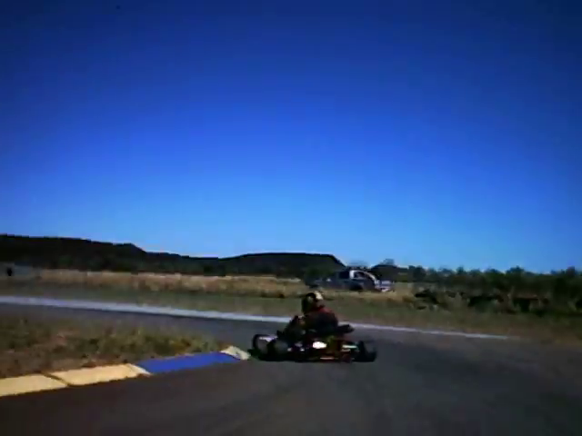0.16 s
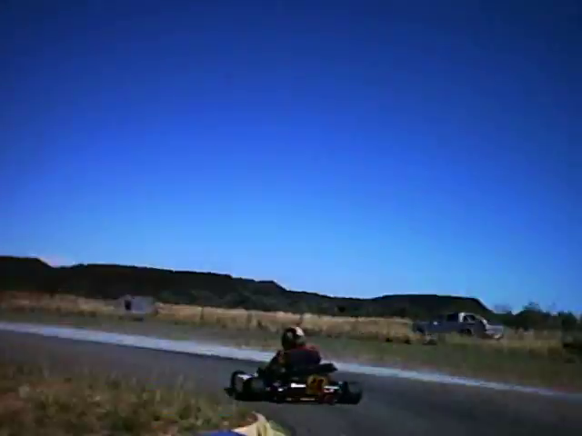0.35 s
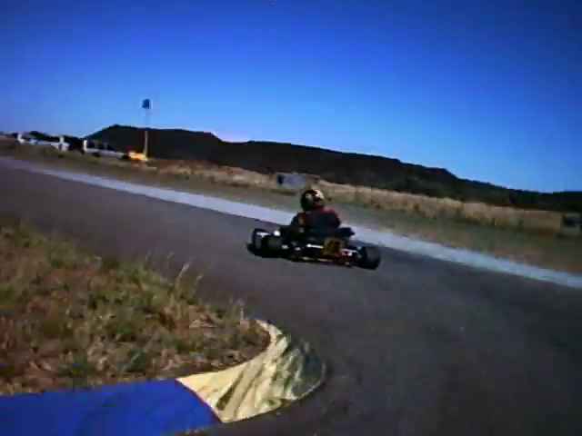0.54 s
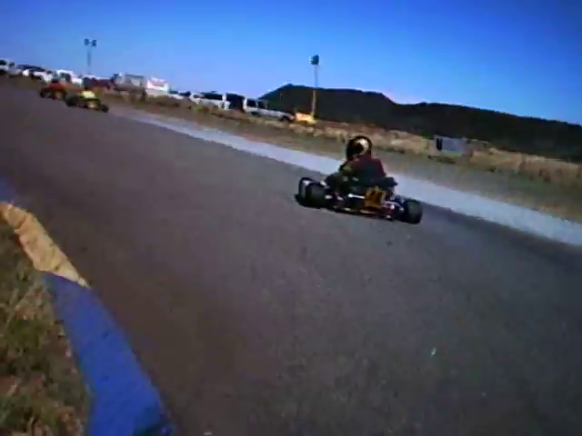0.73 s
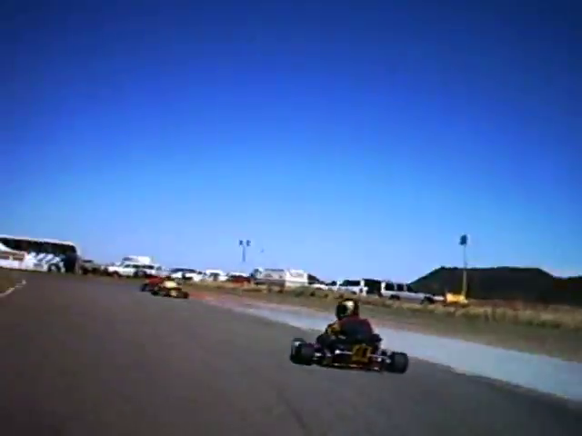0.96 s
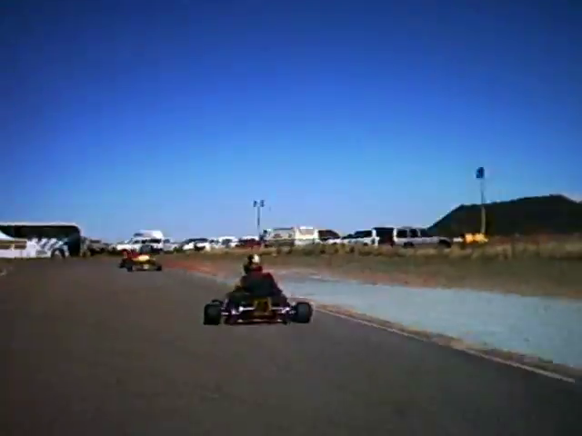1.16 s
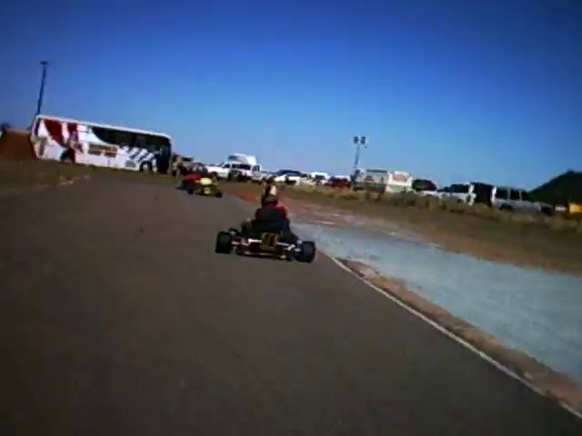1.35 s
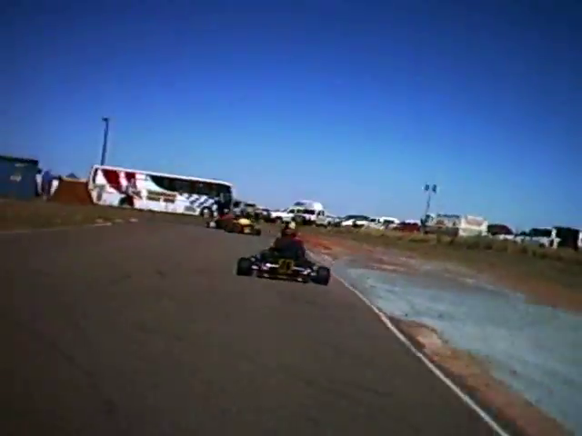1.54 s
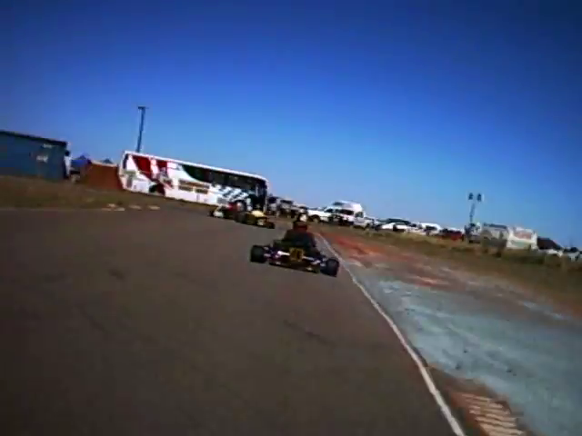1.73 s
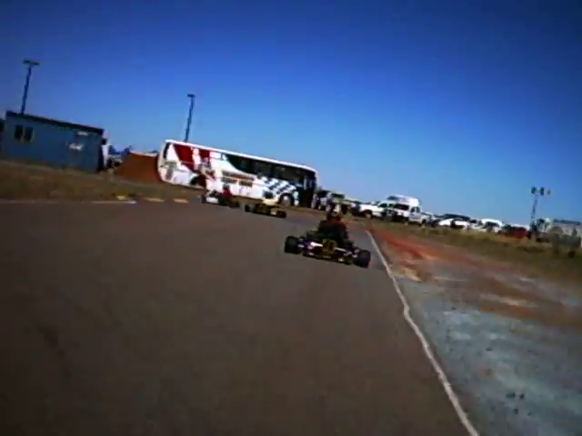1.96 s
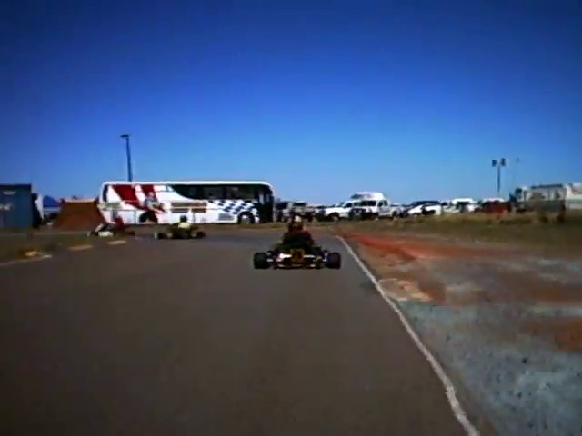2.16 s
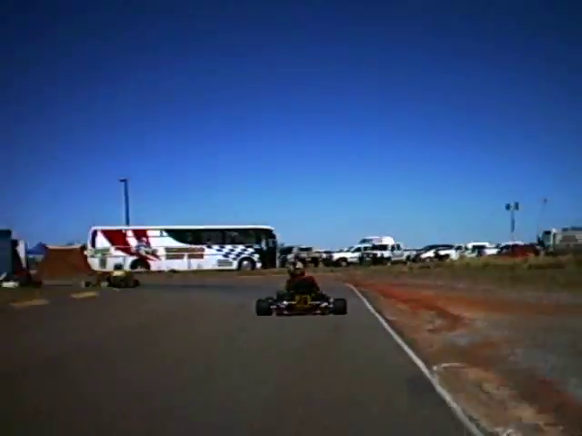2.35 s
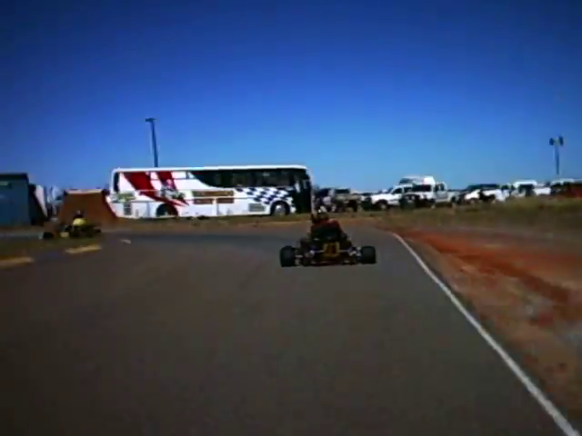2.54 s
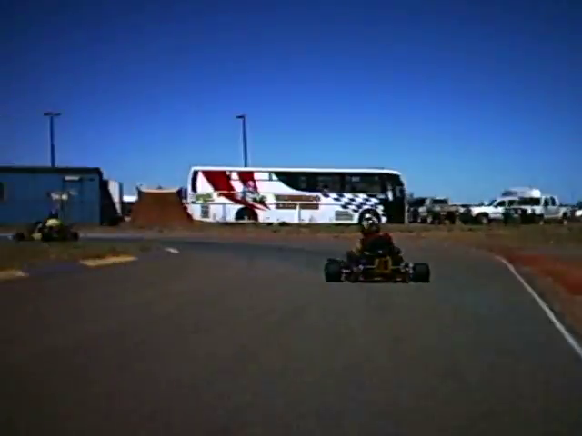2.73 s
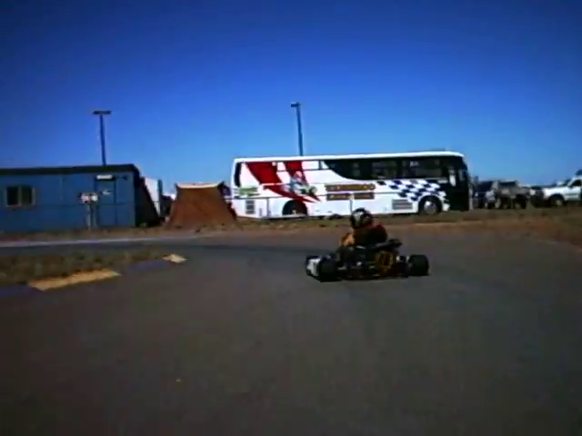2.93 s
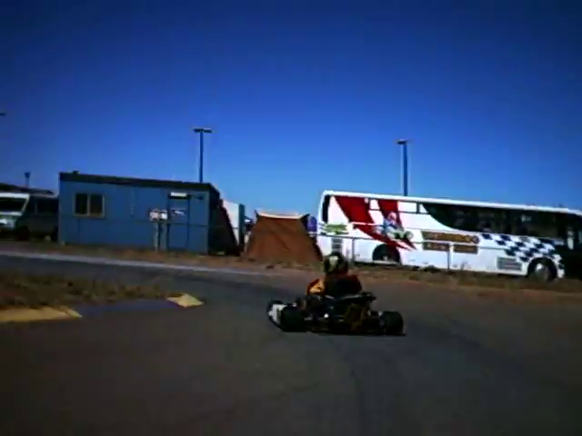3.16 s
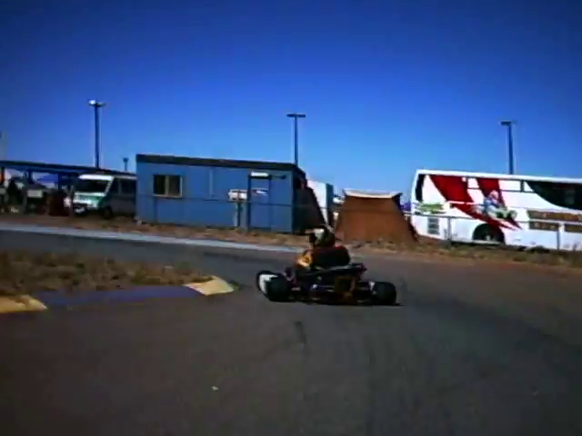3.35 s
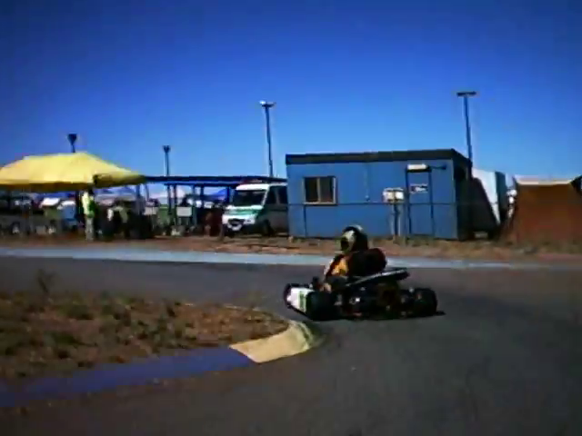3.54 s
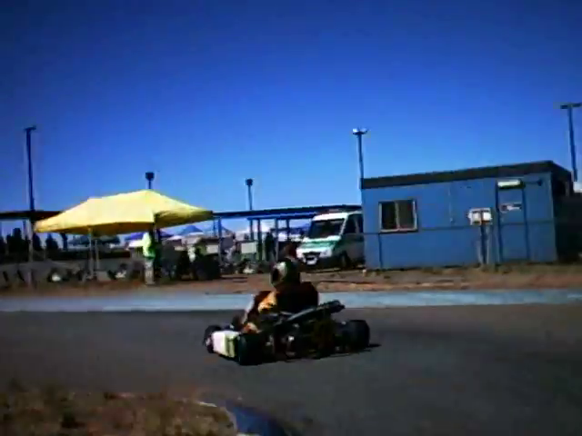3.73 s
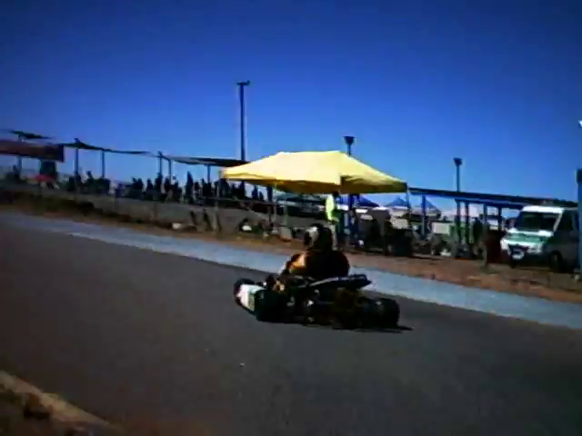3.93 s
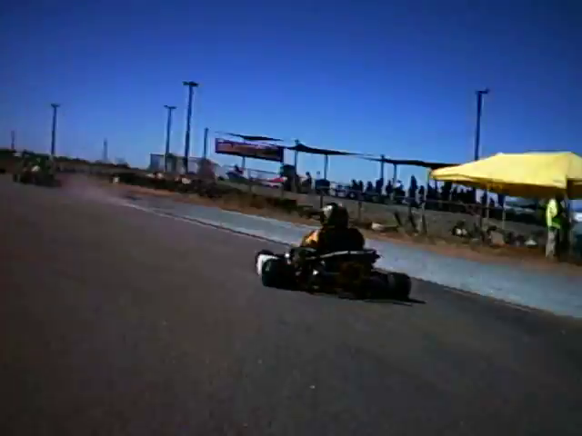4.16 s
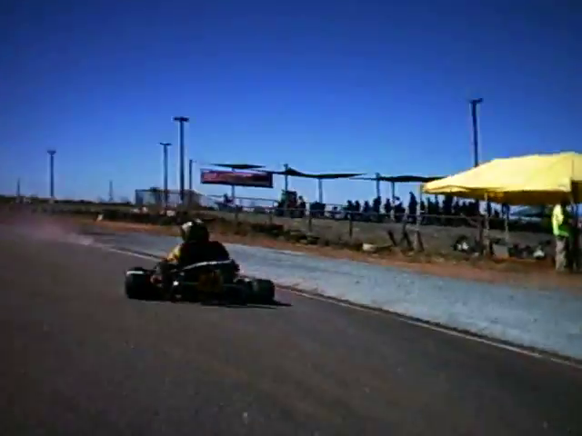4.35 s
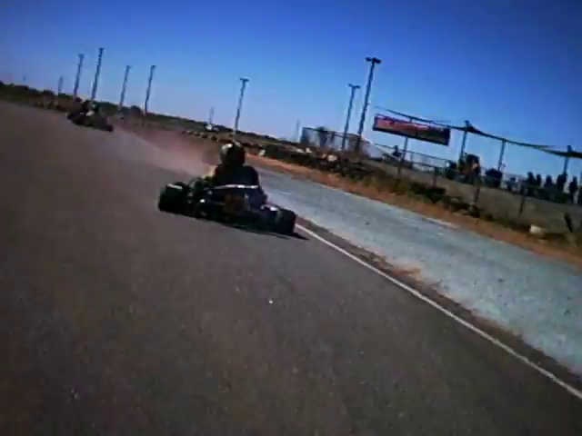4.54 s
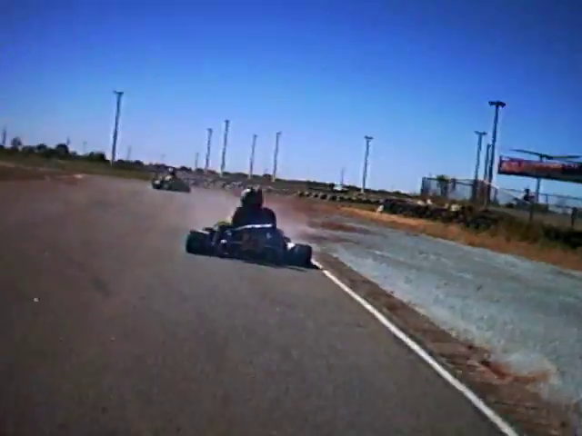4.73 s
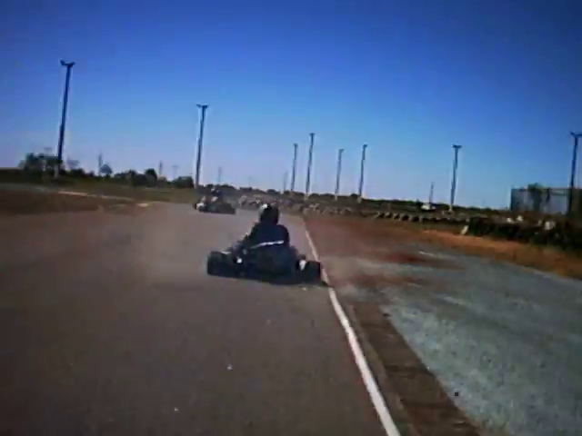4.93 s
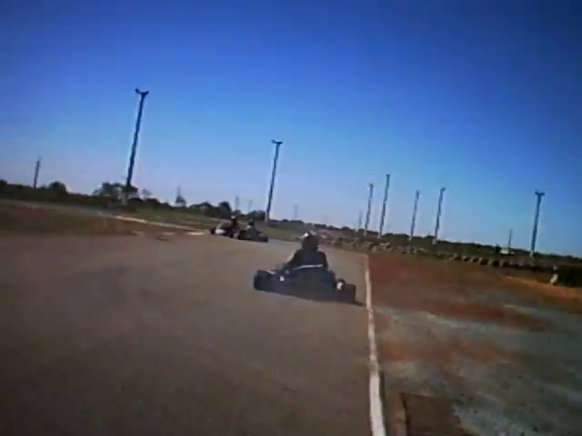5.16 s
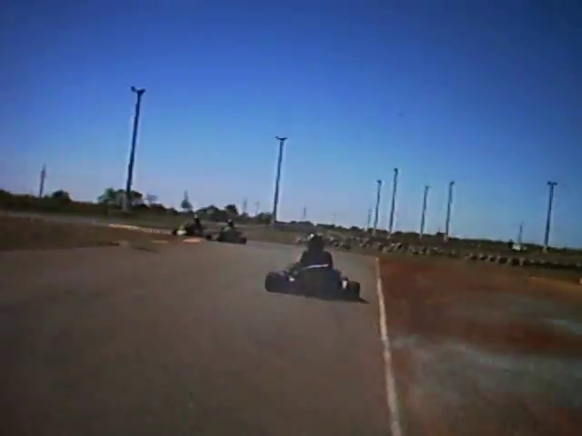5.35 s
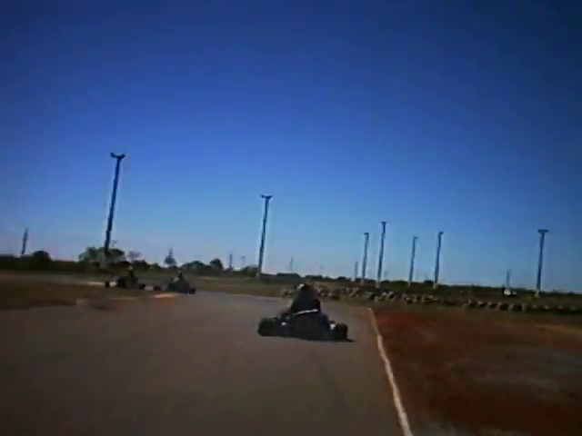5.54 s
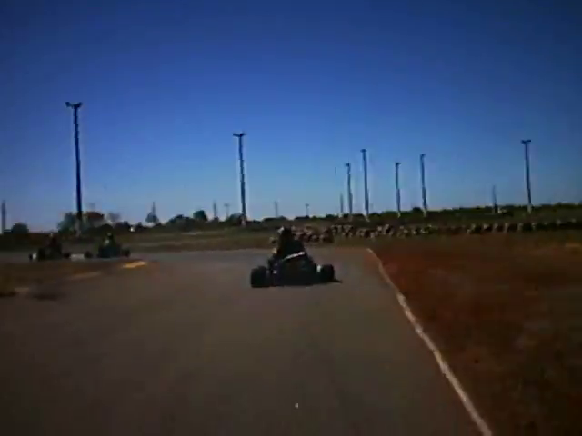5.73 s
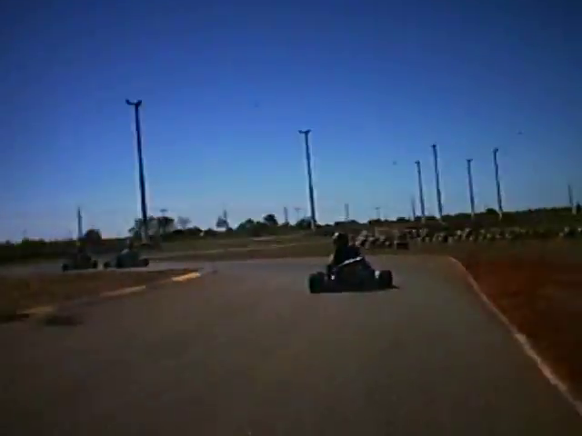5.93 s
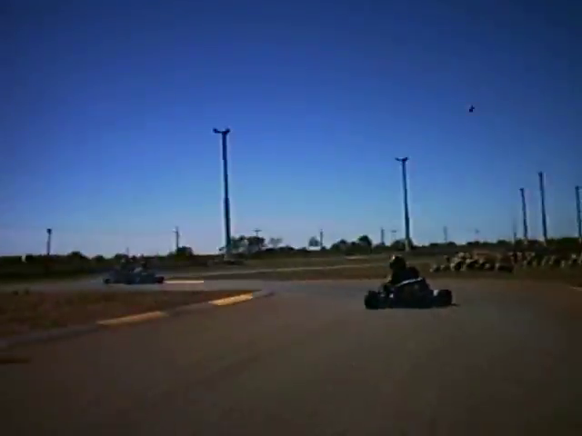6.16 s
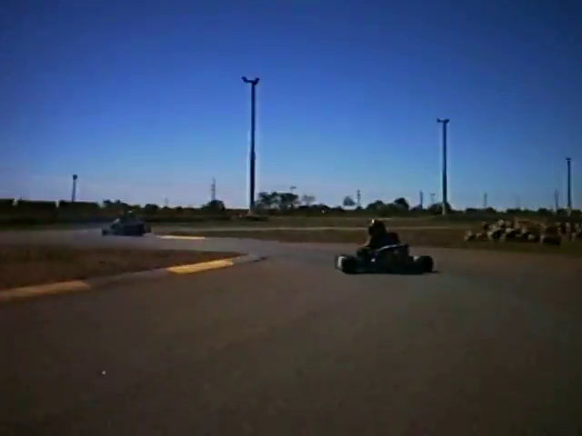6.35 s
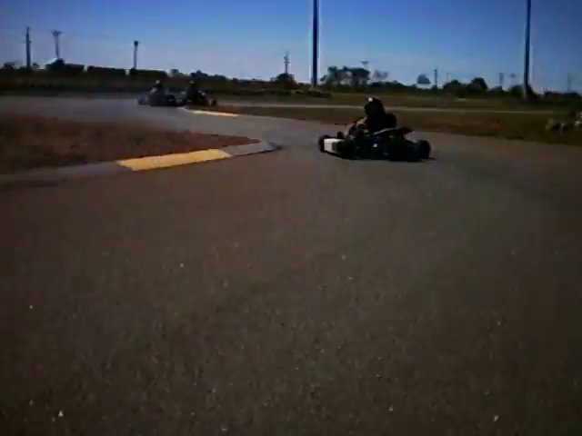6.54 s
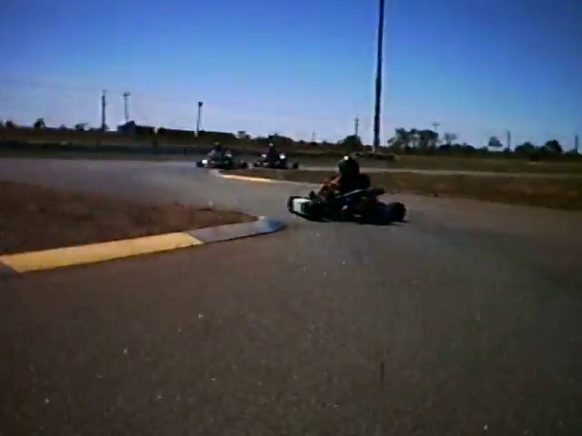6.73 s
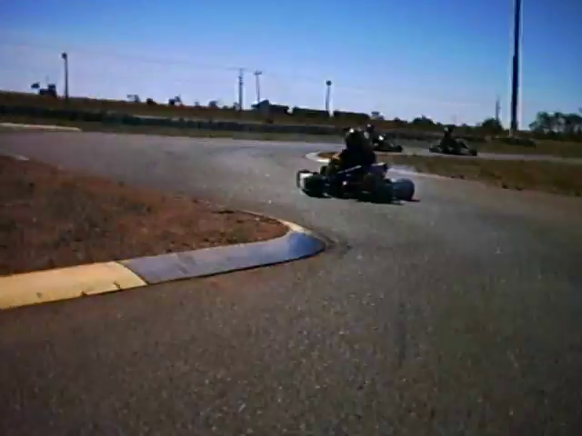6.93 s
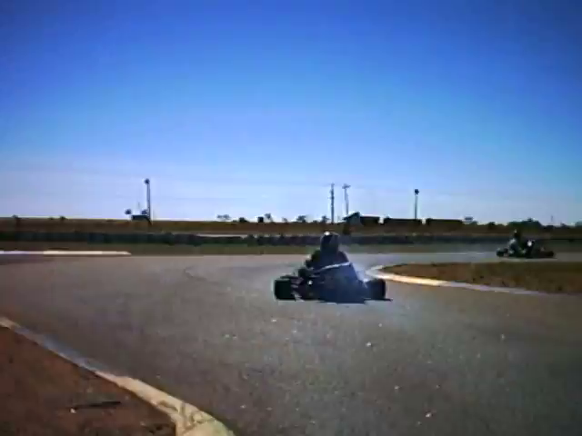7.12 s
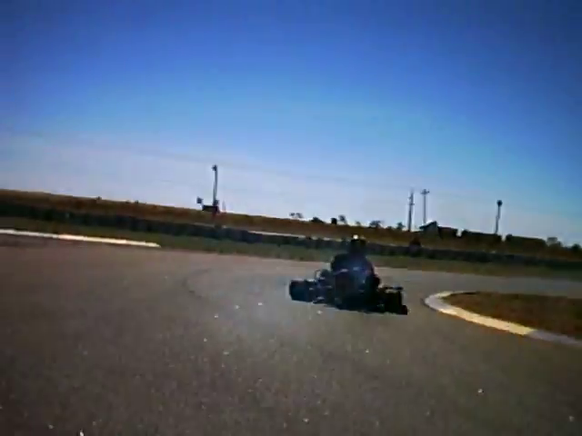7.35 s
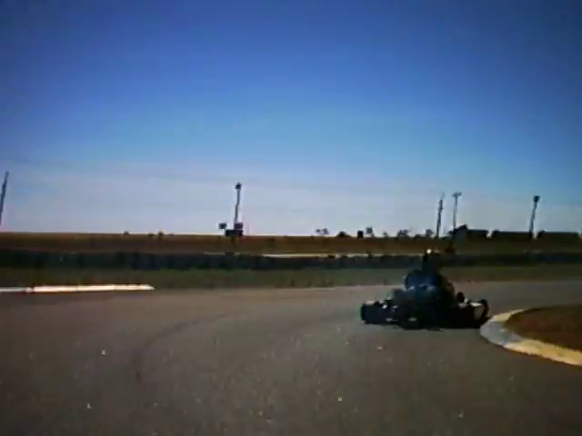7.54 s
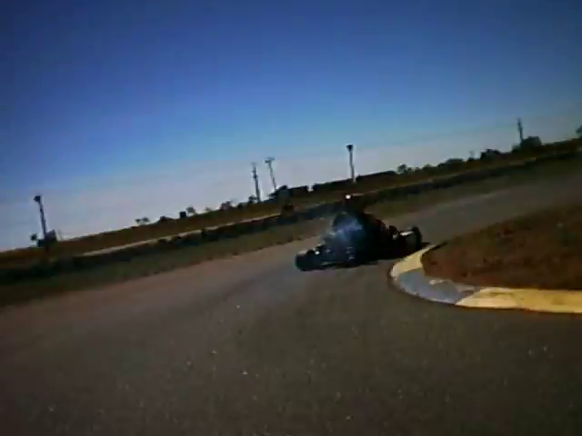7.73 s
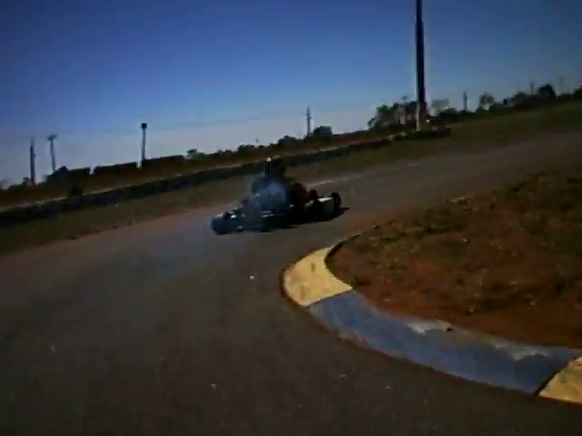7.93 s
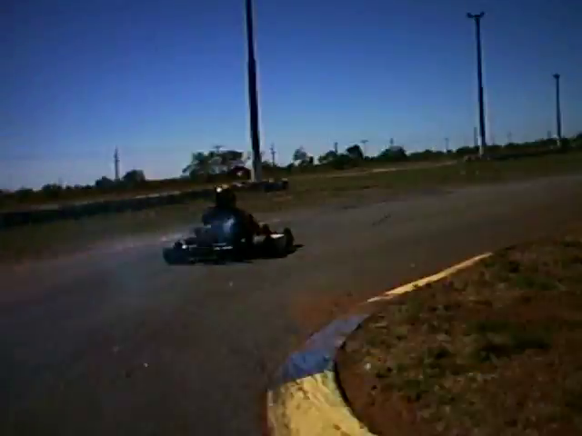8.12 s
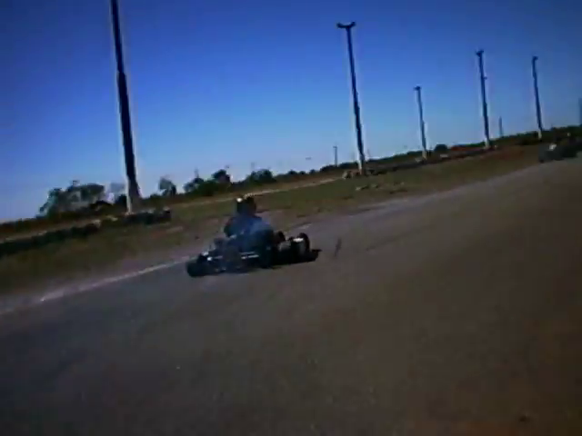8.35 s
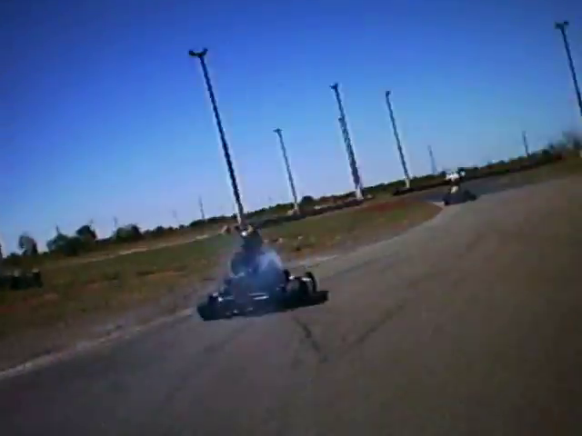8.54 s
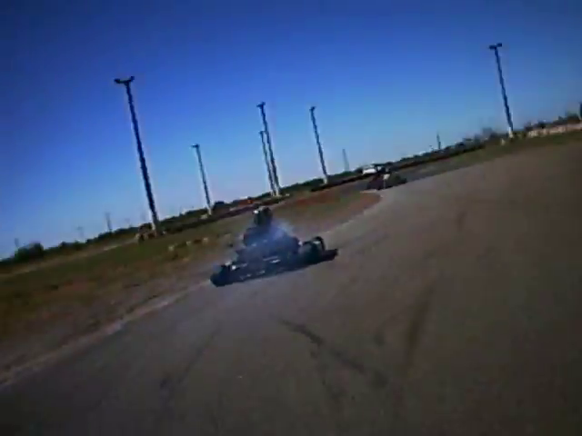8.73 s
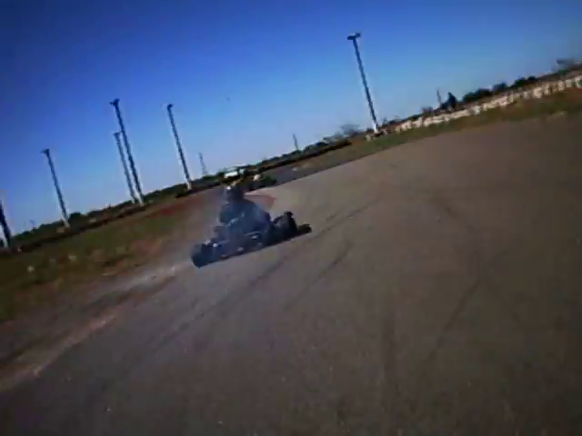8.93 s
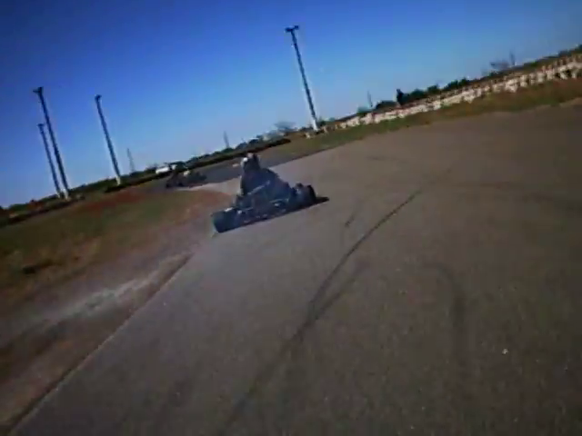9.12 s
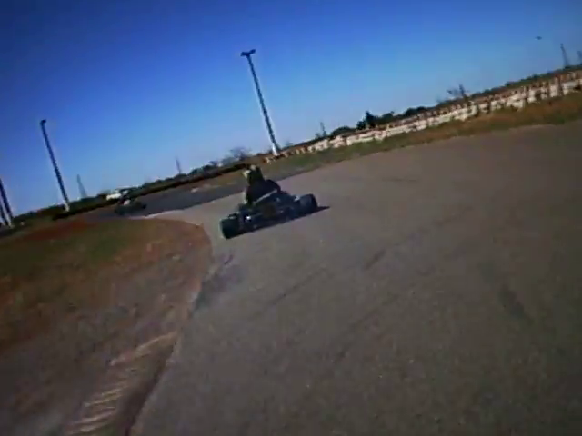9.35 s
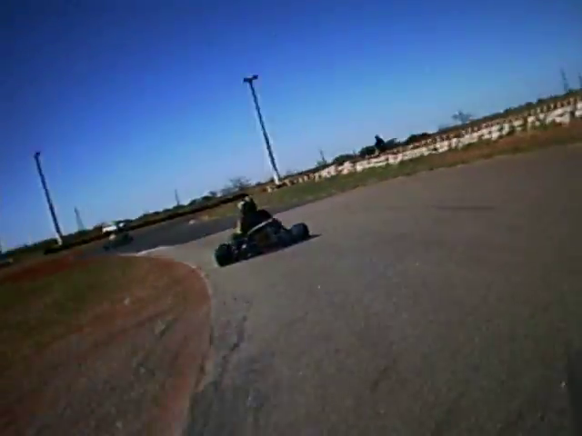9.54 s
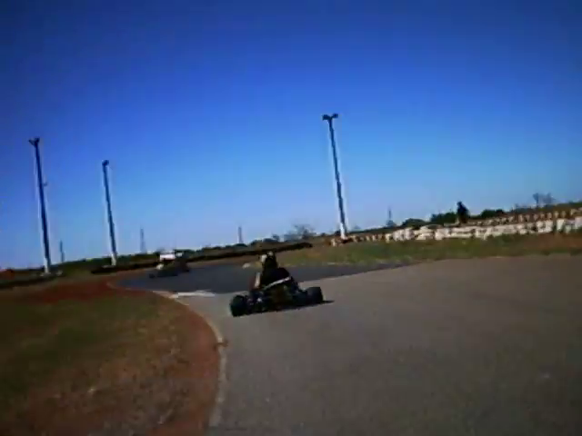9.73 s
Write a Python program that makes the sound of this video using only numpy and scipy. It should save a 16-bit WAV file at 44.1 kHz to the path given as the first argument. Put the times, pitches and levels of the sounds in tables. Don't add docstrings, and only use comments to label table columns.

```python
import sys
import numpy as np
from scipy import signal
from scipy.fft import rfft, irfft
from scipy.io import wavfile

SR = 44100
rng = np.random.default_rng(int(sys.argv[2]) if len(sys.argv) > 2 else 0)


def convert_level_to_amplitude(level_db):
    exponent = np.asarray(level_db, float) / 20
    return 10 ** exponent


def materialize(psi):
    bounded = np.clip(np.atleast_2d(psi).T, -1, 1)
    quanta = np.round(bounded * 32767).astype(np.int16)
    wavfile.write(sys.argv[1], SR, quanta)


N = 431298

# t/s, f/Hz
OWN_FIRING_HZ = [(0.0, 211.8), (0.45, 205.8), (0.69, 188.1), (1.2, 192.5), (2.14, 231.4), (2.21, 190.0),
                 (3.0, 191.9), (3.42, 172.4), (4.35, 162.2), (5.1, 172.6), (5.4, 190.9), (6.44, 232.4),
                 (6.64, 204.3), (7.2, 190.8), (7.7, 175.9), (8.4, 176.7), (9.0, 193.4), (9.78, 225.3)]
# t/s, rise/Hz, rise and fall time/s
FLARES_HZ = [(0.55, 4.1, 0.12), (0.94, 5.0, 0.06), (1.07, 11.4, 0.12), (1.31, 10.2, 0.08),
             (1.52, 9.4, 0.06), (2.45, 8.1, 0.12), (2.79, 2.9, 0.15), (3.6, 17.0, 0.12), (3.77, 7.4, 0.1),
             (4.0, 6.3, 0.12), (4.11, 7.0, 0.2), (4.25, 7.1, 0.1), (4.47, 7.6, 0.08), (4.65, 7.8, 0.1),
             (4.76, 8.9, 0.2), (4.96, 6.1, 0.2), (5.15, 10.7, 0.06), (5.33, 6.0, 0.08), (5.43, 7.5, 0.15),
             (5.7, 3.7, 0.12), (6.25, 3.9, 0.2), (6.9, 4.6, 0.2), (7.52, 11.3, 0.2), (7.83, 6.1, 0.08),
             (8.0, 15.1, 0.12), (8.52, 15.9, 0.1), (8.74, 8.1, 0.08), (8.95, 8.0, 0.08), (9.32, 3.0, 0.1),
             (9.56, 4.8, 0.08)]
# t/s, level/dB
LOAD_DB = [(0, -22), (.75, -17.5), (.92, -17), (1.5, -9), (2.0, -10.5), (2.4, -14), (2.7, -28.5),
           (3.5, -18.5), (3.8, -15.5), (4.4, -17.5), (4.75, -17.5), (5.6, -13.5), (6.3, -17), (6.5, -21),
           (7.1, -25), (7.4, -19.5), (8.5, -14), (9.78, -14)]
# t/s, level/dB, rise and fall time/s
STABS_DB = [(.25, -3, 0.29), (1.95, -3, 0.29), (3.05, -4, 0.18), (6.6, -4, .15), (7.3, 4.5, 0.16),
            (.5, -1.5, 0.089), (1.2, 5, 0.058), (3.2, 3, 0.25), (3.55, -8, 0.14), (4.95, -8.5, 0.084),
            (5.55, 4.5, 0.15), (7.75, -6.5, 0.16), (7.98, 3.5, 0.063), (8.25, -1.5, .12), (8.55, 3.5, .1),
            (9.1, -3, 0.16), (9.4, -2.5, 0.17)]
# order/1, level/dB
OWN_ORDERS_DB = [(1, 3), (2, -2.5), (3, -9), (4, 2.5), (5, -.5), (6, 1), (7, -1.5), (8, -2.5), (10, 0),
                 (13, -2.5), (16, -5.5), (20, -10)]
# offset/dB, share of load swing/1, flare slope/(dB/Hz), firing rate slope/(dB/Hz)
ORDER_GROUPS = [
    (-1, 1, 0.25, 0.06),
    (-0.36, 0.75, 0.35, 0.135),
    (-2.9, 1, 0.14, 0.24),
    (-3.5, 0.75, 0.47, 0.1043),
]
# f/Hz, level/dB
PIPE_PATH_DB = [(410, -33), (800, -31), (950, -19), (1170, -9), (1370, -13), (1500, -21), (1850, -23),
                (2150, -10), (2530, -5), (2860, 2), (3100, -1.5), (3330, -13), (3650, -11), (4020, -17),
                (4400, -30)]
# t/s, f/Hz
RIVAL_FIRING_HZ = [
    [(.15, 161.8), (.31, 155.7), (.49, 168), (.54, 168.3), (.6, 175), (.83, 180.7), (.91, 189.7),
     (1.15, 195.5)],
    [(4, 146.8), (4.22, 149.3), (4.51, 161), (4.7, 173), (4.84, 182.3), (5, 190.5), (5.46, 215.3),
     (5.7, 223.8)],
]
# t/s, level/dB
RIVAL_FIRST_DB = [(.15, -39), (.3, -29.5), (0.499, -28.5), (0.699, -27), (0.848, -26), (1.001, -23),
                  (1.15, -27.5)]
RIVAL_SECOND_DB = [(4, -36), (4.1, -25.5), (4.298, -28.5), (4.502, -26), (4.754, -34), (5.002, -19.5),
                   (5.25, -27.5), (5.503, -27), (5.701, -27)]
# order/1, level/dB
RIVAL_ORDERS_DB = [(1, -25.5), (3, -16.5), (4, -5.5), (7, -5.5), (10, 2.1), (14, -4), (17, -11.5), (22, -6)]
# t/s, level/dB
ROAR_DB = [(0, -14), (0.9, -16.5), (1.8, -14), (2.5, -12), (3.0, -17.5), (3.5, -17.5), (4.5, -12),
           (5.4, -11.0), (5.8, -15.5), (6.2, -11), (6.9, -7.5), (7.6, -11.5), (7.85, -14.5), (8.5, -11.5),
           (9.1, -8), (9.78, -14.5)]
# t/s, level/dB, rise and fall time/s
SURGES_DB = [(.25, -1.5, 0.1), (.67, -3, 0.05), (.86, -1, 0.049), (.98, 2.5, 0.13), (1.42, 6.5, 0.037),
             (2.18, -6, 0.19), (3.58, 3, 0.096), (4.98, 1, 0.053), (5.5, 2.5, 0.13), (6.49, -3, 0.086),
             (6.68, -1.5, 0.1), (6.99, -1, 0.062), (7.43, -3.5, 0.05), (8.02, 1, 0.3), (8.41, 2, 0.05),
             (8.73, -2, 0.11), (8.98, -0.5, 0.13), (9.55, 2.5, 0.15)]
# level/dB, shares of roar, wind and load swing/1, slow patchiness/dB, quick patchiness/dB
ROAR_PARTS = [
    (-28, 0.44, 0.43, 0.39, 1.9, 1.3),
    (-15, 1.44, 0.03, 0.31, 1.11, 0.76),
    (-23.5, 0.46, 0.62, 0.011, 1.77, 2),
]
# f/Hz, level/dB
HOUSING_DB = [(410, -29), (750, -24), (950, -22), (1170, -12), (1370, -16), (1500, -22), (1800, -19.5),
              (2130, -16), (2530, -11), (2860, -3), (3100, -7.5), (3330, -19), (3650, -9.5), (4020, -17),
              (4370, -22.5), (4800, -69.5)]
# t/s, peak level/dB, thud f/Hz, thud level/dB
KNOCKS = [
    (0.148, -15, 61.9, -39),
    (1.468, -9.5, 73.5, -26),
    (2.218, -14, 142.3, -37),
    (2.361, -10, 61.5, -38),
    (2.909, -10.5, 142, -32.5),
    (3.784, -28, 64.3, -31),
    (4.598, -13, 140.3, -43),
    (5.282, -16, 71, -32.5),
    (6.91, -26, 57.7, -27),
    (8.642, -28, 131, -26.5),
]
# t/s, level/dB
WIND_DB = [(0, -44.5), (0.8, -50.5), (1.5, -42), (2.1, -43.5), (2.45, -33.5), (3, -49), (3.5, -42),
           (4.3, -41.5), (5.2, -35.8), (6.2, -35), (7, -34.5), (7.9, -42), (8.6, -32), (9.78, -33.5)]
# t/s, level/dB, rise and fall time/s
GUSTS_DB = [(.94, 7, .08), (1.47, 2.5, .12), (1.73, 6.5, .16), (2.17, -3, 0.22), (2.45, -4, .08),
            (3.5, -4, 0.2), (4.12, -5, 0.13), (5.08, -9.5, 0.065), (6.22, 4, .12), (6.69, -6.5, .08),
            (7.16, -11, 0.072), (7.42, -6, 0.08)]
# f/Hz, level/(dB per Hz)
BUFFET_SPECTRUM_DB = [(12, -42), (20, -7), (80, -3), (400, -10.5), (520, -36.5), (880, -120)]

MID_LOAD_DB, MID_FIRING_HZ = -18, 195
MID_ROAR_DB, MID_WIND_DB = -13, -40


def own_kart():
    (cruise_hz,), (load_db,) = in_time(OWN_FIRING_HZ), in_time(LOAD_DB)
    flare_hz = swells(FLARES_HZ)
    load_swing_db = load_db + swells(STABS_DB) - MID_LOAD_DB
    groups_db = []
    for offset_db, load_share, flare_db_per_hz, rate_db_per_hz in ORDER_GROUPS:
        group_db = MID_LOAD_DB + offset_db + load_share * load_swing_db
        group_db = group_db + flare_db_per_hz * flare_hz + rate_db_per_hz * (cruise_hz - MID_FIRING_HZ)
        groups_db.append(group_db)
    low, middle, high, top = groups_db
    order_db = 3 * [middle] + 2 * [low] + 2 * [middle] + 4 * [high] + 9 * [top]
    return buzz(cruise_hz + flare_hz, OWN_ORDERS_DB, order_db, wobble=.002, flutter_db=3)


def buzz(firing_hz, orders, order_db, wobble, flutter_db):
    turns = np.cumsum(firing_hz * (1 + wobble * drift(25))) / SR
    out = np.zeros(N)
    for k, load_db in enumerate(order_db, 1):
        path_db = on_log(PIPE_PATH_DB, k * firing_hz)
        level_db = load_db + on_log(orders, k) + path_db + flutter_db * drift(5)
        out += convert_level_to_amplitude(level_db) * np.sin(2 * np.pi * (k * turns + rng.random()))
    return out, turns


def kart_ahead(firing_table, loudness_table):
    (firing_hz,), (buzz_db,) = in_time(firing_table), in_time(loudness_table)
    t = np.arange(N) / SR
    start_s, end_s = firing_table[0][0], firing_table[-1][0]
    fade = np.clip(np.minimum(t - start_s, end_s - t) / .1, 0, 1)
    tone, _ = buzz(firing_hz, RIVAL_ORDERS_DB, 22 * [buzz_db + 8], wobble=.0015, flutter_db=3)
    return fade * tone


def roar(turns, puff_depth=.2):
    roar_swing_db = in_time(ROAR_DB)[0] + swells(SURGES_DB) - MID_ROAR_DB
    wind_swing_db = in_time(WIND_DB)[0] + swells(GUSTS_DB) - MID_WIND_DB
    load_swing_db = in_time(LOAD_DB)[0] - MID_LOAD_DB
    swings_db = roar_swing_db, wind_swing_db, load_swing_db
    puff = 1 + puff_depth * np.cos(2 * np.pi * turns)
    bands_hz = [((750, 1720), "band"), ((1726, 3437), "band"), (3437, "high")]
    out = np.zeros(N)
    for (hz, kind), (part_db, *shares, slow_db, quick_db) in zip(bands_hz, ROAR_PARTS):
        noise = passed(puff * rng.standard_normal(N), hz, kind, order=3)
        boxed = rms_one(coloured(noise, HOUSING_DB))
        patchy_db = slow_db * drift(5.3) + quick_db * drift(28.0)
        out += convert_level_to_amplitude(part_db + np.dot(shares, swings_db) + patchy_db) * boxed
    return out


def knocks(box_hz=1170, box_t60_s=0.03, thud_t60_s=0.1):
    out, t = np.zeros(N), np.arange(SR // 5) / SR
    for s, peak_db, thud_hz, thud_db in KNOCKS:
        ring = convert_level_to_amplitude(peak_db + 0.5 - 60 * t / box_t60_s) * np.sin(2 * np.pi * box_hz * t)
        thud = convert_level_to_amplitude(thud_db + 8.5 - 60 * t / thud_t60_s) * np.sin(2 * np.pi * thud_hz * t)
        out[round(s * SR):][:len(t)] += ring + thud
    return out


def wind(lumpy_db=2.0, gust_share=0.47):
    swing_db, gust_db = in_time(WIND_DB)[0] - MID_WIND_DB, swells(GUSTS_DB)
    buffet_db = -38.5 + 0.79 * (swing_db + gust_share * gust_db) + lumpy_db * drift(6.3)
    buffet = rms_one(coloured(rng.standard_normal(N), BUFFET_SPECTRUM_DB))
    rush_db = -39.5 + 1.39 * (swing_db + gust_db) + 0.66 * drift(13.0)
    rush = rms_one(passed(rng.standard_normal(N), (280, 950), "band"))
    return convert_level_to_amplitude(buffet_db) * buffet + convert_level_to_amplitude(rush_db) * rush


def in_time(rows):
    s, *columns = np.transpose(rows)
    return [np.interp(np.arange(N) / SR, s, c) for c in columns]


def swells(rows):
    t = np.arange(N) / SR
    return sum(np.interp(t, (s - span, s, s + span), (0, height, 0)) for s, height, span in rows)


def drift(rate_hz):
    r = np.exp(-32 * np.pi * rate_hz / SR)
    slow = signal.lfilter([1], [1, -2 * r, r * r], rng.standard_normal(N // 16 + 3002))[3000:]
    return np.interp(np.arange(N) / 16, np.arange(len(slow)), rms_one(slow))


def rms_one(x):
    return x / np.sqrt(np.mean(x ** 2) + 1e-20)


def on_log(points, at):
    position, level_db = np.transpose(points)
    return np.interp(np.log(at), np.log(position), level_db)


def coloured(x, spectrum):
    taps = irfft(convert_level_to_amplitude(on_log(spectrum, np.linspace(1, SR / 2, 2049))))
    cepstrum = irfft(np.log(np.abs(rfft(taps)) + 1e-9))
    cepstrum[1:2048] *= 2
    cepstrum[2049:] = 0
    return signal.fftconvolve(x, irfft(np.exp(rfft(cepstrum))))[:N]


def passed(x, hz, kind, order=2):
    return signal.sosfilt(signal.butter(order, hz, kind, fs=SR, output="sos"), x)


def scene():
    tone, turns = own_kart()
    t = np.arange(N) / SR
    firing = np.clip(np.maximum(2.14 - t, t - 2.225) / .01 + 1, .08, 1)
    rival = kart_ahead(RIVAL_FIRING_HZ[0], RIVAL_FIRST_DB) + kart_ahead(RIVAL_FIRING_HZ[1], RIVAL_SECOND_DB)
    return (convert_level_to_amplitude(.3) * firing * tone + rival + roar(turns) + knocks() + wind())[None]


def band_limit(x):
    return signal.sosfilt(signal.butter(12, 15800, fs=SR, output="sos"), x)


def record(dry, input_top=.61, band_edge_hz=4980, output_top=.73):
    flattened = dry / (1 + np.abs(dry / input_top) ** 8) ** (1 / 8)
    banded = signal.sosfiltfilt(signal.cheby2(8, 35, band_edge_hz, fs=SR, output="sos"), flattened)
    return band_limit(np.clip(banded, -output_top, output_top))


dry = scene()
out = record(dry)
materialize(out)
```